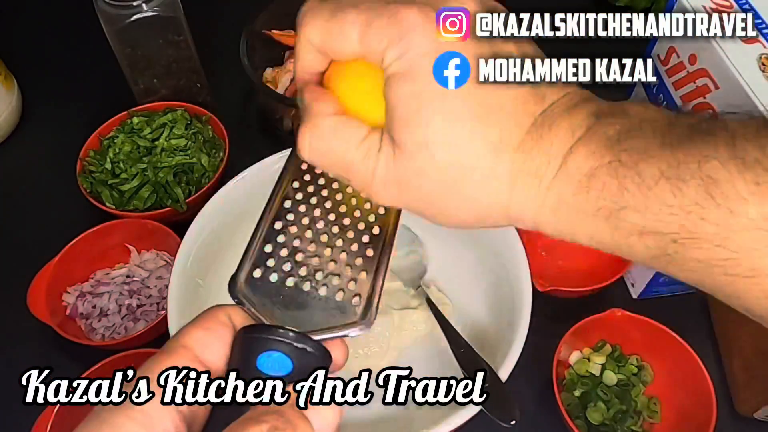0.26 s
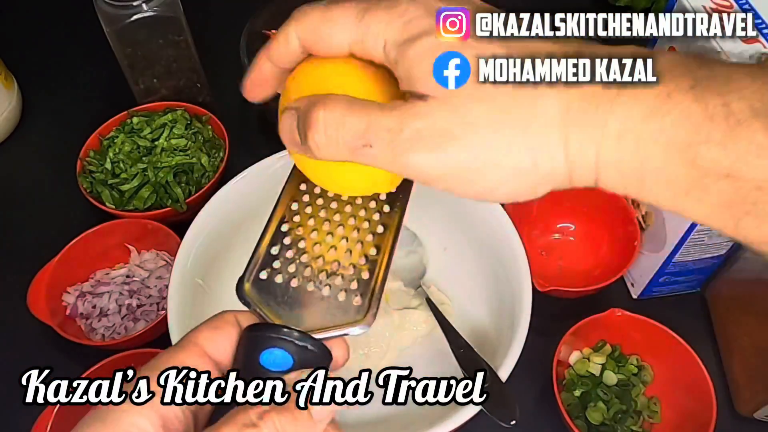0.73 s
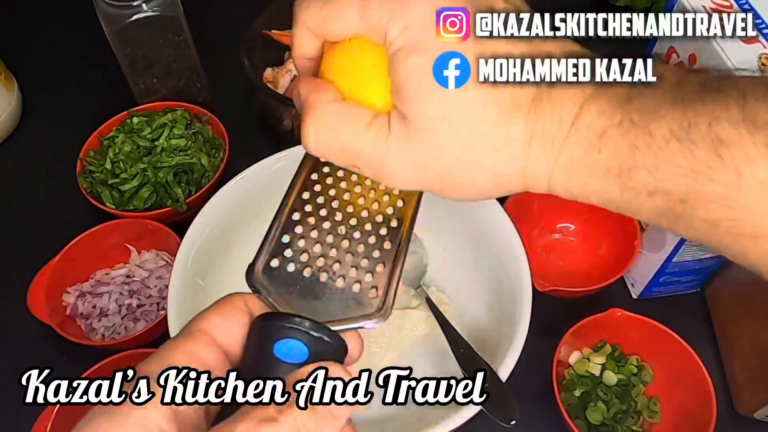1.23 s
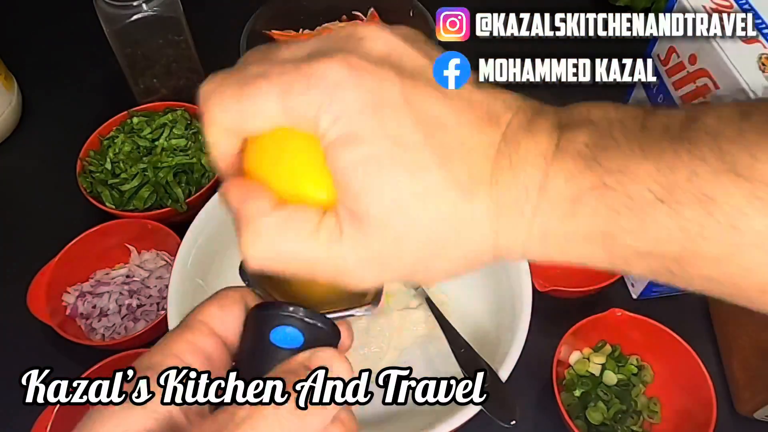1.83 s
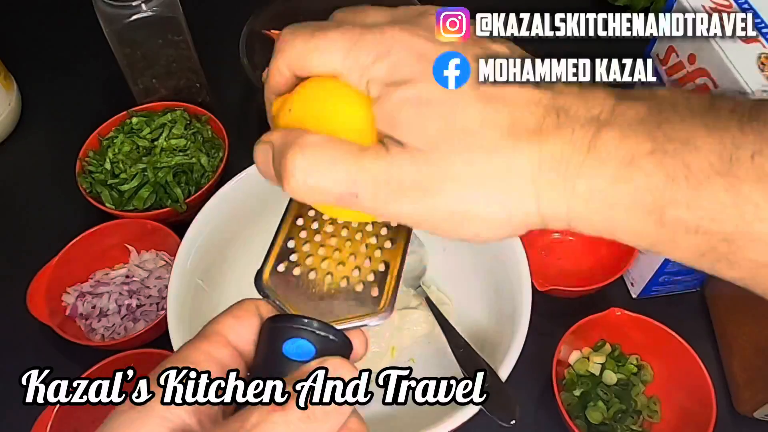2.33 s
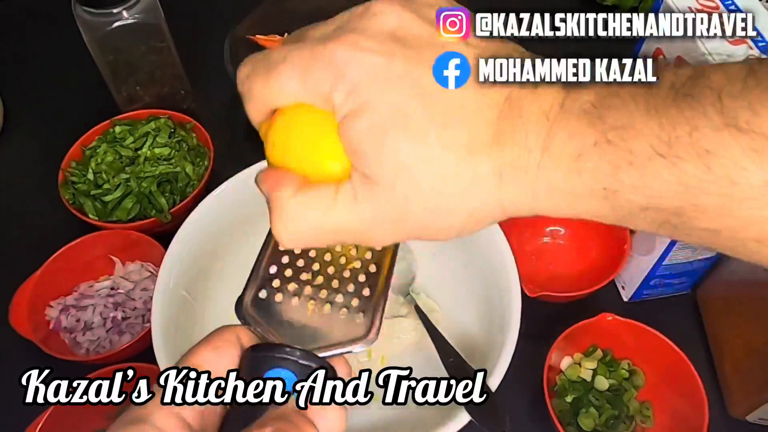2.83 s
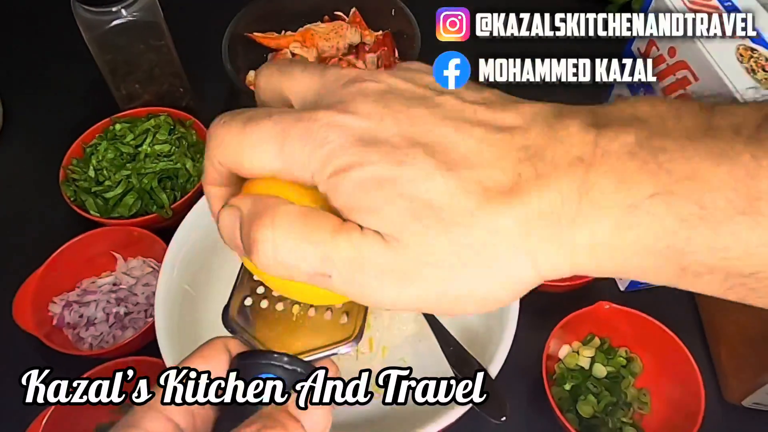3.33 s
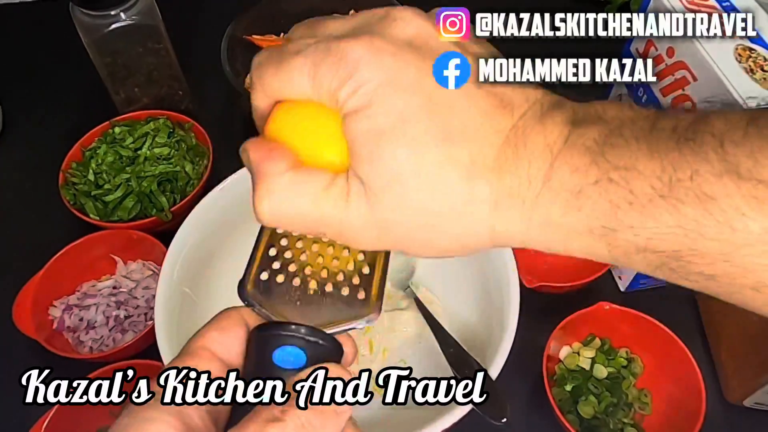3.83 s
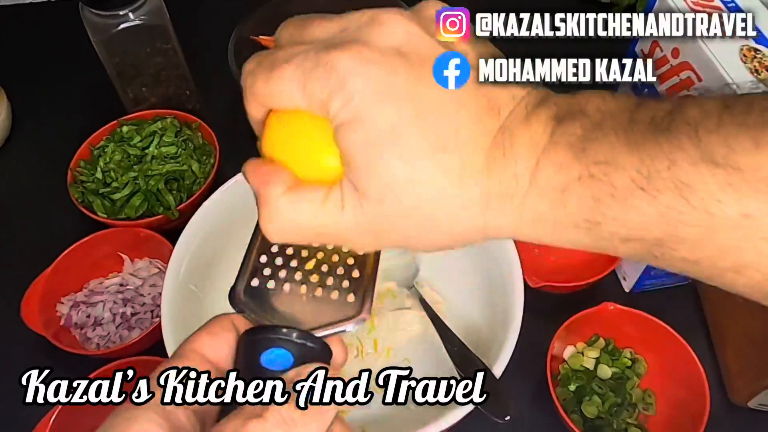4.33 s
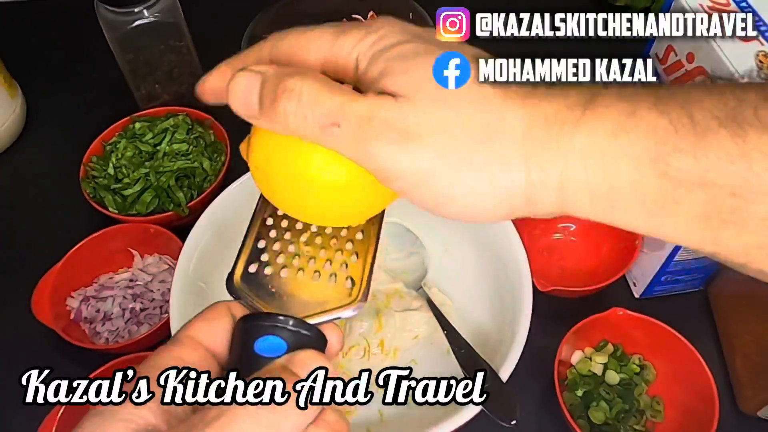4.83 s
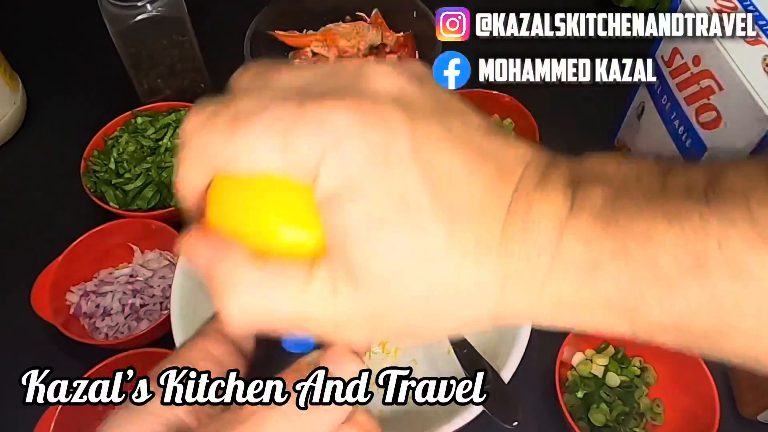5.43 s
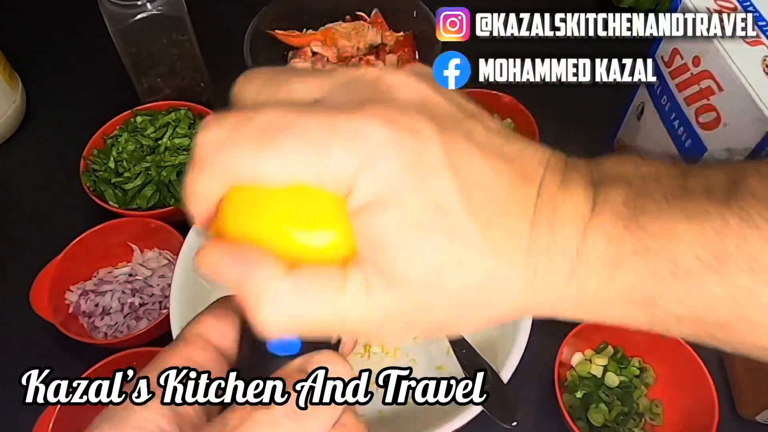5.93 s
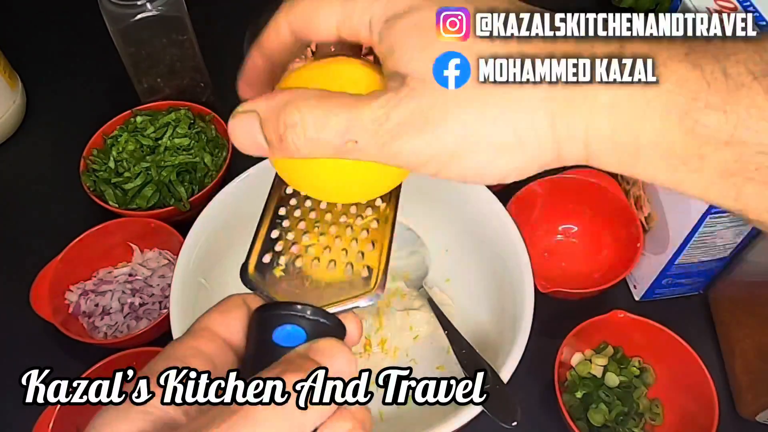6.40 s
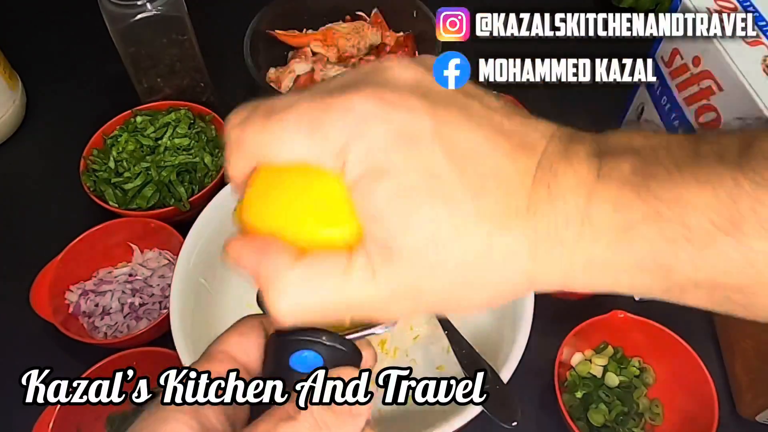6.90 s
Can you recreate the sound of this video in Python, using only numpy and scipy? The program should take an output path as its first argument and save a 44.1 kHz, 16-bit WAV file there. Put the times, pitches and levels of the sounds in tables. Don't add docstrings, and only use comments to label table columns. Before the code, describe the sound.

A lemon rasps in quick bursts of crackling strokes over a small steel grater, close up, with a low compressor hum in the kitchen behind.

```python
import sys
import numpy as np
from scipy import signal
from scipy.fft import rfft, irfft, next_fast_len
from scipy.io import wavfile
from scipy.ndimage import uniform_filter1d, map_coordinates

SR = 44100
rng = np.random.default_rng(int(sys.argv[2]) if len(sys.argv) > 2 else 0)


def attenuation_scalar(level_db):
    decades = np.asarray(level_db, float) / 20
    return 10 ** decades


def output_pcm(signal):
    pcm = np.clip(np.atleast_2d(signal).T, -1, 1) * 32767
    wavfile.write(sys.argv[1], SR, np.round(pcm).astype(np.int16))


N = 315756
SIZE = next_fast_len(N + SR)
FREQS = np.maximum(np.fft.rfftfreq(SIZE, 1 / SR), 1)

# [f/Hz, rms level/dB, wobble/dB]
MOTOR_TONES = [(58.6, -39, -0.36), (87, -53, 4), (147.4, -59.5, 2.5), (187.8, -58.5, 4.0), (370, -61.5, 0),
               (417.7, -57.5, 2.5), (474, -65, 3.5), (530, -69.5, 3.5), (567, -76.5, -4.5)]
# [f/Hz, level/dB per Hz]
AIR_NOISE = [(15, -11), (35, 2), (60, 1), (100, -1.5), (257, 1), (440, -5), (600, -17), (750, -22),
             (1200, -19.5), (2560, -39), (4500, -45.5), (7400, -41), (8500, -51), (15500, -72)]
# [t/s, peak level/dB]
ARM_THUMPS = [
    (.17, -44),
    (1.801, -43.5),
    (2.72, -47),
    (3.35, -45),
    (4.05, -39),
    (4.72, -38),
    (5.55, -40.5),
    (6.4, -42),
]
# [f/Hz, time to fall 60 dB/s]
KITCHEN_DECAY = [(500, .5), (3000, 0.36), (12000, 0.52)]
# [f/Hz, likeness/0-1, lag of the left/radians]
PORT_LIKENESS = [(30, 1, .05), (500, 0.82, 0.15), (1500, 0.74, 0.37), (3100, 0.9, 0.99), (4800, 0.77, 0.63),
                 (6670, 0.41, 1.1), (8320, 0.5, 5.2), (9560, 0.9, 0.8), (14770, 0.1, .7)]
# [f/Hz, left level/dB per Hz, right level/dB per Hz]
RASP_COLOUR = [(286, -10, -11), (814, -23, -25), (964, -13, -12), (1670, -8, -10), (2600, -6.5, -7.5),
               (2870, -6, -10), (3580, -5.5, -12), (7000, -16, -20), (7330, -13, -19.5), (8180, -36, -44),
               (9050, -27, -19), (10040, -33, -29), (12500, -38.5, -31), (15710, -49.5, -49.5)]
# [f/Hz, width/Hz, level/dB]
PLATE_MODES = [(1577, 220, -2), (2060, 240, -14.5), (2860, 47, -3), (3030, 98, -4), (3304, 50, -10.5),
               (4130, 55, -3.5), (4810, 210, -2.5), (6110, 370, -7.5), (8430, 460, -1.5)]
# [t/s, peak level/dB]
FINGER_PEELS = [
    (0.8094, -53),
    (0.9278, -68),
    (2.2401, -74.5),
    (4.929, -49),
    (6.4974, -42),
]
# [t/s, peak level/dB, f/Hz]
JUICE_SNAPS = [
    (1.1354, -42, 4500),
    (2.4662, -41, 3820),
    (3.5344, -37.5, 5200),
    (5.127, -47.5, 4500),
    (5.313, -49, 5500),
    (5.5773, -22.5, 4570),
    (6.6144, -51, 3800),
]
# [t/s, peak level/dB, f/Hz]
TOOTH_TICKS = [(0.1314, -46, 2270), (0.194, -16.5, 2940), (0.883, -62, 2680), (0.94, -56, 2370),
               (1.0344, -59, 2290), (1.2475, -40, 2870), (1.365, -28, 3000), (1.748, -27, 3200),
               (1.762, -38, 3300), (1.792, -23, 3150), (1.9805, -20, 3110), (1.9994, -17.5, 3320),
               (2.676, -33, 3070), (2.721, -33, 3450), (3.132, -25, 2510), (3.32, -30.5, 4930),
               (3.522, -47, 2300), (3.8574, -39, 3240), (4.224, -32, 3020), (4.4135, -25, 2600),
               (5.081, -54, 3000), (6.2835, -36, 2470), (6.519, -60, 2503), (7.01, -37, 2910)]
# [t/s, length/s, level/dB, share spent swelling/0-1, bass/dB]
TURNING_TOUCHES = [(-0.042, 0.087, -45.5, 0.44, 5), (0.66, 0.016, -67.0, 0.05, -2),
                   (0.731, 0.66, -71, 0.37, 6), (2.139, 0.14, -67, 0.72, -2),
                   (2.462, 0.067, -59.5, 0.1, 12), (3.499, 0.067, -67, 0.6, 5), (4.808, 0.33, -62, 0.08, 3),
                   (4.912, 0.15, -63.0, 0.3, 2.5), (5.126, 0.043, -58, 0.03, 3),
                   (5.271, 0.11, -66, 0.6, 4.5), (6.362, 0.3, -73, 0.92, 7)]
# [t/s, length/s, level/dB, share spent swelling/0-1, bass/dB]
BACK_DRAGS = [(0.005, 0.135, -44.5, 0.79, -2), (0.229, 0.14, -46.5, 0.61, -1),
              (0.44, 0.15, -44, 0.61, -1.5), (1.169, 0.18, -56, 0.54, 0.1), (1.419, 0.13, -44.5, 0.67, 0.7),
              (1.666, 0.13, -42.5, 0.4, -1.3), (1.88, 0.13, -36.5, 0.52, -3),
              (2.584, 0.12, -51.5, 0.75, -1), (2.839, 0.14, -53.5, 0.43, 1),
              (3.047, 0.12, -41.5, 0.71, -0.2), (3.258, 0.171, -50.5, 0.51, -0.5),
              (3.793, 0.16, -61, 0.3, -0.2), (4.062, 0.11, -48.5, 0.66, 0.8),
              (4.297, 0.11, -44.5, 0.62, -2.8), (4.528, 0.13, -47, 0.59, 3), (5.53, 0.14, -41, 0.64, 0.5),
              (5.77, 0.134, -42, 0.59, -0.6), (5.988, 0.13, -35.5, 0.79, 0.1), (6.236, 0.22, -48, 0.25, -6),
              (6.706, 0.25, -57.5, 0.37, 0.1), (6.932, 0.17, -46.5, 0.74, -2)]
# [t/s, length/s, level/dB, share spent swelling/0-1, bass/dB]
CUTTING_STROKES = [(0.13, 0.11, -31.5, 0.65, 1.2), (0.352, 0.098, -27.0, 0.5, 1),
                   (0.567, 0.1, -30.0, 0.54, 0.2), (1.313, 0.11, -30.5, 0.61, -1.5),
                   (1.536, 0.11, -27.0, 0.51, 5.2), (1.77, 0.092, -22.5, 0.32, 1),
                   (1.99, 0.11, -25, 0.17, -6.5), (2.698, 0.11, -28.5, 0.72, 0.1),
                   (2.944, 0.094, -26.5, 0.46, 2.5), (3.157, 0.092, -23.5, 0.44, -0.8),
                   (3.902, 0.14, -34, 0.64, 3.3), (4.161, 0.059, -34.0, 0.77, 4.5),
                   (4.22, 0.023, -32.5, 0.09, 6.5), (4.389, 0.11, -24.5, 0.43, 0.5),
                   (4.64, 0.09, -26.5, 0.5, -1), (5.407, 0.12, -28, 0.68, 1.2),
                   (5.643, 0.119, -27, 0.68, 0.5), (5.88, 0.11, -23.5, 0.57, 2),
                   (6.109, 0.12, -24.5, 0.39, 0.8), (6.845, 0.13, -31.5, 0.61, 0.8),
                   (7.079, 0.1, -28.5, 0.46, 0.3)]


def rms_one(x):
    return x / np.sqrt(np.mean(x ** 2) + 1e-20)


def at_hz(rows, axis=1):
    rows = np.array(rows, float)
    return np.interp(np.log(FREQS), np.log(rows[:, 0]), rows[:, axis])


def causal(db):
    cepstrum = irfft(np.log(attenuation_scalar(db)), SIZE)
    cepstrum[1:SIZE // 2] *= 2
    cepstrum[SIZE // 2 + 1:] = 0
    return np.exp(rfft(cepstrum))


def drift(rate_hz, count=1):
    r = np.exp(-16 * np.pi * rate_hz / SR)
    noise = rng.standard_normal((count, N // 8 + 5001))
    slow = signal.lfilter([1], [1, -2 * r, r * r], noise)[:, 5000:]
    slow = slow / slow.std(axis=1, keepdims=True)
    return np.repeat(slow, 8, axis=1)[:, :N]


def ring(clicks, hz, t60):
    r = attenuation_scalar(-60 / (t60 * SR))
    w = 2 * np.pi * hz / SR
    return signal.lfilter([0, np.sin(w)], [1, -2 * r * np.cos(w), r * r], clicks + 1e-18)


def at_ports(shared, own):
    alike = np.clip(at_hz(PORT_LIKENESS), 0, 1)
    lag = at_hz(PORT_LIKENESS, axis=2)
    lagged = shared * np.exp(.5j * np.outer([-1, 1], lag))
    return np.sqrt(alike) * lagged + np.sqrt(1 - alike) * own


def compressor():
    hz, db, wobble_db = np.transpose(MOTOR_TONES)[:, :, None]
    count = len(MOTOR_TONES)
    phase = 2 * np.pi * hz * np.arange(N) / SR + 0.23 * wobble_db * drift(2.5, count)
    height = np.sqrt(2) * attenuation_scalar(db + wobble_db * drift(16.0, count))
    tones = np.sum(height * np.sin(phase), axis=0)
    tones = np.array([np.roll(tones, shift=2), tones])

    own, shared = rng.standard_normal((2, SIZE)), rng.standard_normal(SIZE)
    air = at_ports(rfft(shared), rfft(own)) * attenuation_scalar(at_hz(AIR_NOISE))
    air = attenuation_scalar(-47.5) * rms_one(irfft(air, SIZE)[:, :N])
    return air * attenuation_scalar(np.array([[.7], [-.7]])) + tones * attenuation_scalar(np.array([[1.1], [-1.3]]))


def thumps(hz, width_s):
    out = np.zeros(N)
    for s, db in ARM_THUMPS:
        t = np.arange(N) / SR - s
        out += attenuation_scalar(db) * np.exp(-(t / width_s) ** 2) * np.sin(2 * np.pi * hz * t)
    return out


def kitchen():
    out = 0
    for k, lag_s in enumerate(rng.uniform(.011, 0.046, size=22)):
        loss = attenuation_scalar(-60 * lag_s / at_hz(KITCHEN_DECAY))
        loop = loss * np.exp(-2j * np.pi * FREQS * lag_s)
        out = out + (-1) ** k * loop / (1 - loop)
    return out / np.sqrt(np.mean(np.abs(out) ** 2))


def ports(x, echo_s, swing_s, swing_hz):
    swing = uniform_filter1d(drift(swing_hz, count=2), size=64)
    delay = SR * np.abs(echo_s + swing_s * swing)
    echoes = map_coordinates(x, [np.arange(N) - delay], order=2)
    return at_ports(rfft(x, SIZE), rfft(echoes, SIZE))


def ticks(crack_s, edge):
    length = 600
    out, t = np.zeros(N + length), np.arange(length) / SR
    rows = [(*row, 4.6) for row in TOOTH_TICKS]
    rows += [(*row, 1.8) for row in JUICE_SNAPS]
    rows += [(*row, 8500, 2.8) for row in FINGER_PEELS]
    cracks = rng.standard_normal((len(rows), length)) * np.exp(-t / crack_s)
    cracks[:, 0] += edge
    for (s, db, hz, cycles), crack in zip(rows, cracks):
        t60 = max(cycles, .5) / hz
        push = np.diff(crack, prepend=0)
        snap = ring(ring(push, hz, t60), hz, t60)
        out[round(s * SR):][:length] += attenuation_scalar(db) * snap / np.abs(snap).max()
    wet_skin = signal.butter(2, 8000, fs=SR, output="sos")
    return signal.sosfilt(wet_skin, out[:N])


def pressure(strokes, hold, swell, fade, bass_db, treble_db, sweep_hz, sweep_db):
    out = np.zeros((5, N))
    for s, length, db, lean, own_bass_db in strokes:
        at = np.arange(max(round(s * SR), 0), min(round((s + length) * SR), N))
        u = (at / SR - s) / length
        lean = np.clip(lean, .03, .97)
        rise = np.clip(u / lean / (1 - hold), 0, 1) ** swell
        fall = np.clip((1 - u) / (1 - lean) / (1 - hold), 0, 1) ** fade
        power = (np.minimum(rise, fall) * attenuation_scalar(db)) ** 2
        bass, treble, sweep = [a + u * (b - a) for a, b in (bass_db, treble_db, sweep_hz)]
        out[:, at] += power * np.array([1 + 0 * u, own_bass_db + bass, treble, sweep, sweep_db + 0 * u])
    return out


def rind(force, bass_db, treble_db, sweep_hz, sweep_db, teeth_per_s, teeth_db, per_s, spread_db,
         rows_db, patchy_db, cycles, smooth):
    pitches, dealt = np.geomspace(300, 15000, num=27), rng.integers(0, 27, N)
    octaves = np.log2(pitches[dealt] / 3200)
    coarse = np.clip(1.1 - 0.72 * octaves, .2, 1)

    sizes = attenuation_scalar(coarse * spread_db * np.minimum(rng.exponential(1, N), 4)) * rng.choice([-1, 1], N)
    bursts = rms_one(sizes * (rng.random(N) < per_s / SR))
    clicks = rms_one(bursts + smooth * rng.standard_normal(N))

    tone_db = np.clip(-octaves, 0, 1.4) * bass_db + np.clip(octaves - .4, 0, 1.1) * treble_db
    tone_db += sweep_db * np.exp(-(np.log2(pitches[dealt] / sweep_hz) / .45) ** 2)
    patches_db = patchy_db * drift(28, count=9)[dealt // 3, np.arange(N)]
    bunched_db = coarse * rows_db * drift(150)[0]
    clicks = clicks * force * attenuation_scalar(tone_db + patches_db + bunched_db)

    teeth = attenuation_scalar(teeth_db + 3.55 * np.minimum(rng.standard_normal(N), 1.6)) * rng.choice([-1, 1], N)
    teeth = teeth * (rng.random(N) < teeth_per_s / SR) * force
    out = np.zeros(N)
    for k, hz in enumerate(pitches):
        hits = clicks * (dealt == k) + teeth * np.exp(-np.log2(hz / 3900) ** 2 / 1.2)
        out += (hz / 9000) ** 2 * ring(ring(hits, hz, cycles / hz), hz, cycles / hz)
    return out


def plate(force):
    out = force.copy()
    for hz, width_hz, db in PLATE_MODES:
        r = np.exp(-np.pi * np.clip(width_hz, 120, 600) / SR)
        poles = [1, -2 * r * np.cos(2 * np.pi * hz / SR), r * r]
        out += attenuation_scalar(db) * signal.lfilter([1 - r, 0, r - 1], poles, force)
    return out


def grater():
    cuts = pressure(CUTTING_STROKES, hold=.25, swell=2.4, fade=1, bass_db=(-5.5, -4.5),
                    treble_db=(-3, 2.5), sweep_hz=(4050, 2260), sweep_db=2.64)
    drags = pressure(BACK_DRAGS, hold=0.082, swell=1.35, fade=3.04, bass_db=(5, -1),
                     treble_db=(5, -3.2), sweep_hz=(1200, 3200), sweep_db=4.84)
    touches = pressure(TURNING_TOUCHES, hold=0.054, swell=0.69, fade=3.4, bass_db=(1.5, 1.5),
                       treble_db=(1.5, 2.5), sweep_hz=(2000, 2800), sweep_db=0.69)
    power, *shifts = cuts + drags + touches + 1e-18
    crackle = rind(np.sqrt(power), *(shifts / power), teeth_per_s=600, teeth_db=3.0, per_s=4000,
                   spread_db=1.57, rows_db=.7, patchy_db=1.5, cycles=7.03, smooth=1.0)
    rasp = attenuation_scalar(7.0) * plate(crackle)
    colour = np.array([causal(at_hz(RASP_COLOUR)), causal(at_hz(RASP_COLOUR, axis=2))])
    heard = colour * ports(rasp, echo_s=0.001199, swing_s=.0003, swing_hz=5)
    snaps = ports(ticks(crack_s=0.00085, edge=11.0), echo_s=.0011, swing_s=0.00032, swing_hz=6.5)
    heard = heard + attenuation_scalar(np.array([[3.5], [-1.5]])) * snaps
    return irfft(heard * (1 + attenuation_scalar(-17.5) * kitchen()), SIZE)[:, :N]


def scene():
    return compressor() + thumps(hz=23.8, width_s=0.071) + grater()


def roll_off(x):
    return signal.sosfilt(signal.butter(12, 15700, fs=SR, output="sos"), x)


def record(dry):
    low_pass = signal.cheby2(14, 45, 15800, fs=SR, output="sos")
    mix = signal.sosfilt(low_pass, dry)
    return roll_off(mix)


dry = scene()
out = record(dry)
output_pcm(out)
```